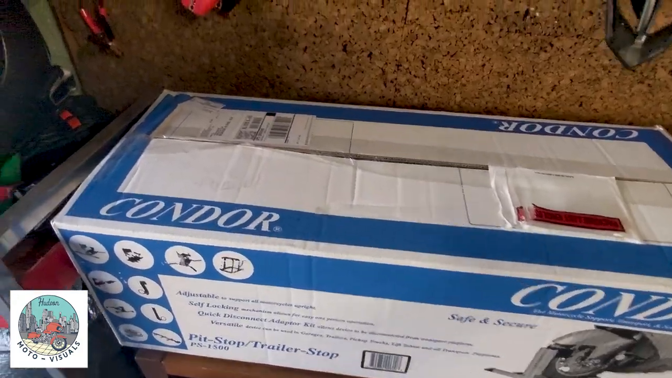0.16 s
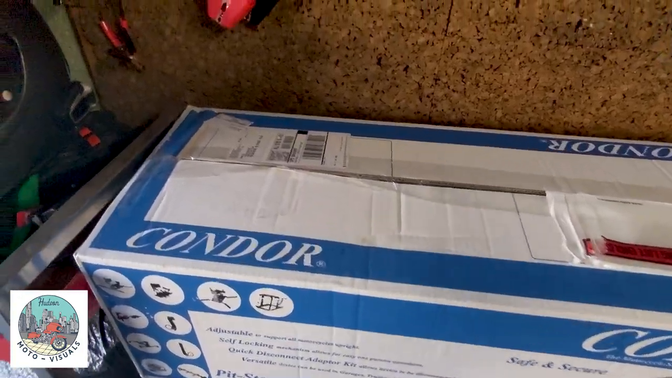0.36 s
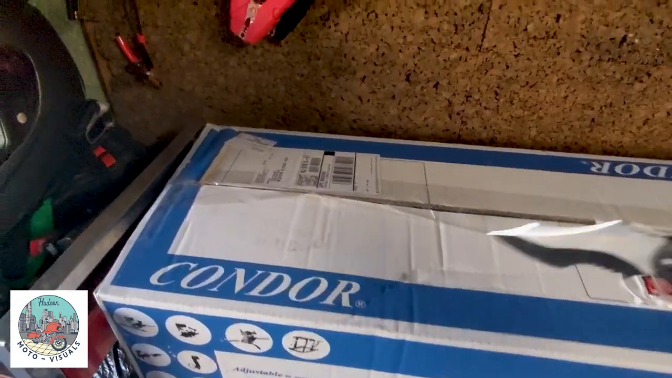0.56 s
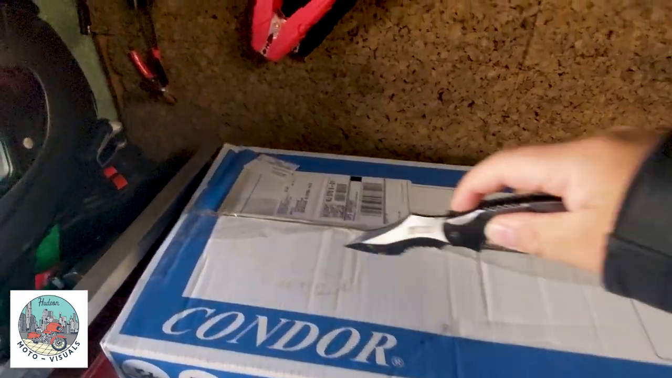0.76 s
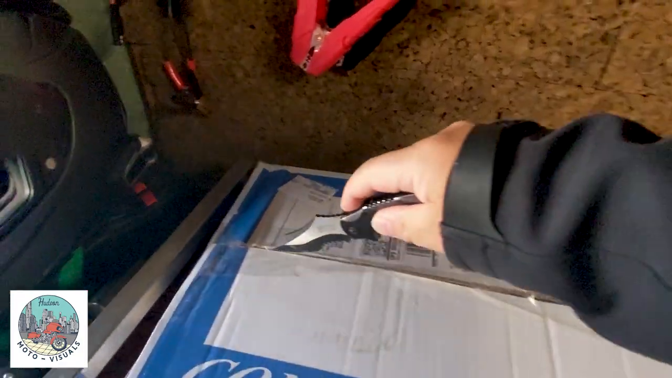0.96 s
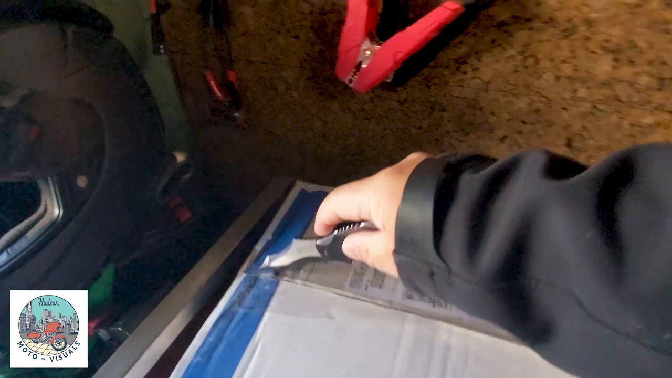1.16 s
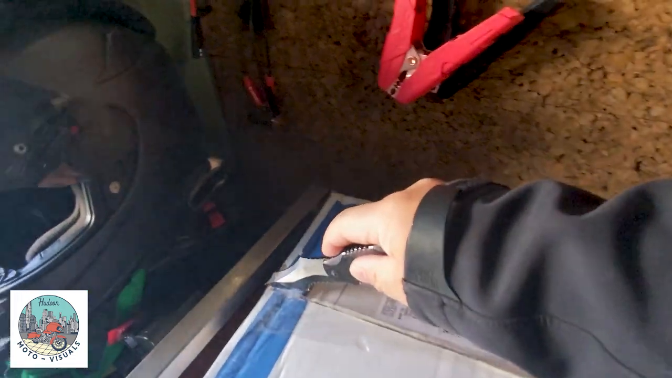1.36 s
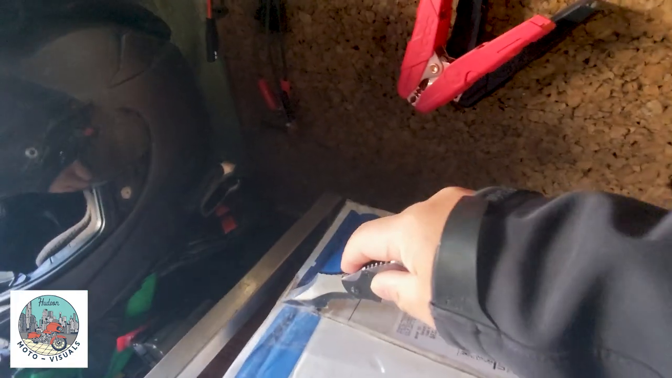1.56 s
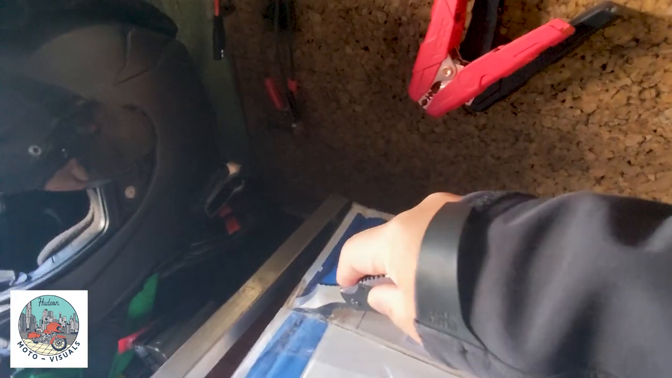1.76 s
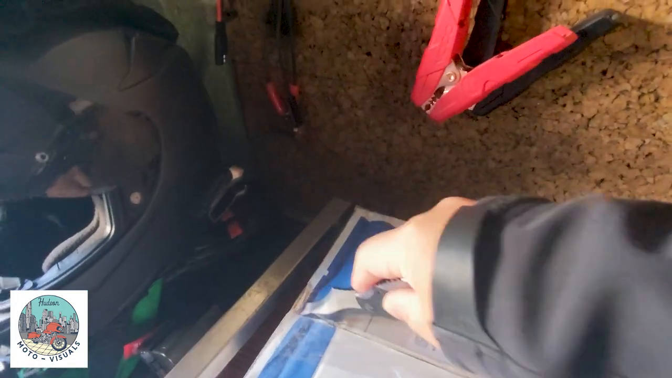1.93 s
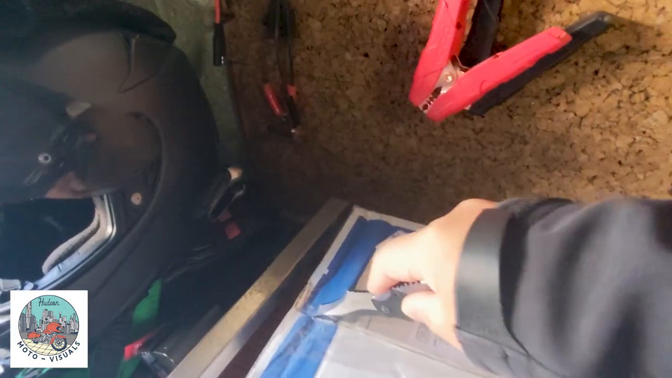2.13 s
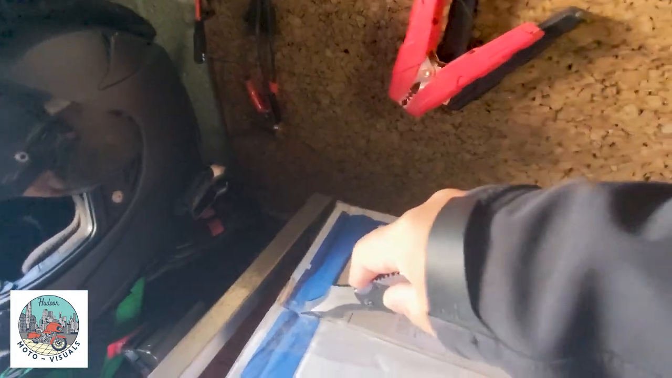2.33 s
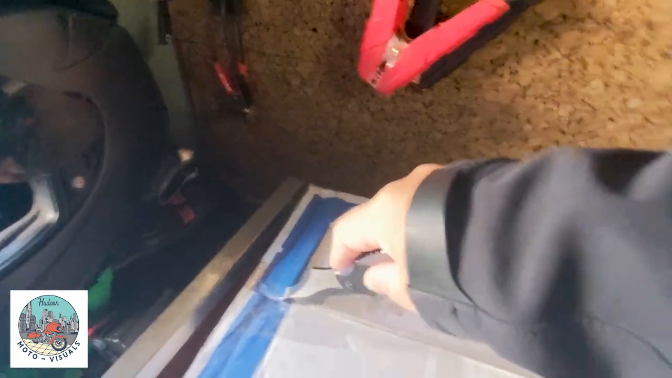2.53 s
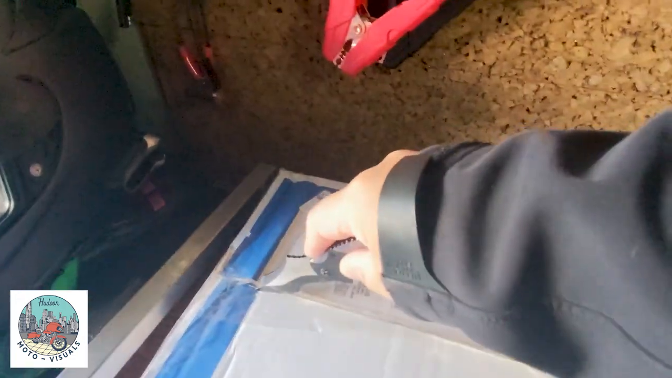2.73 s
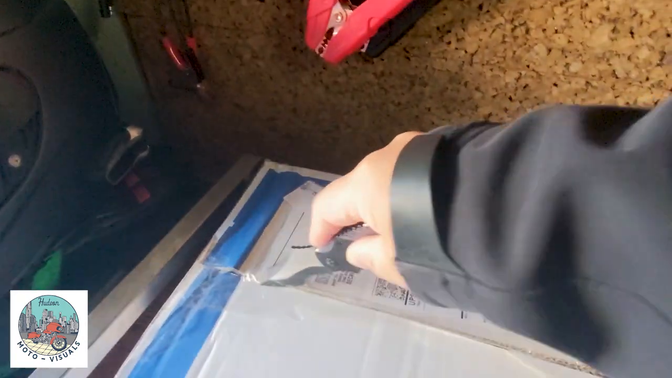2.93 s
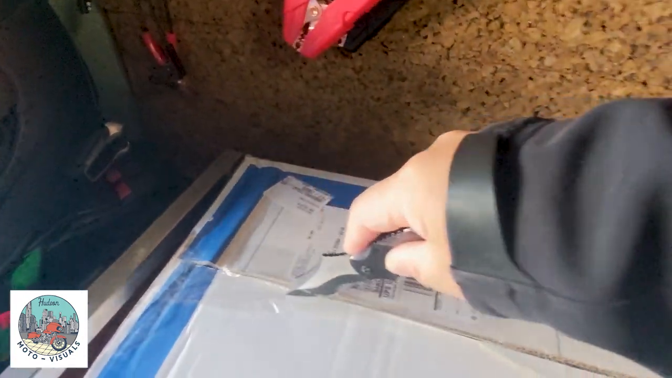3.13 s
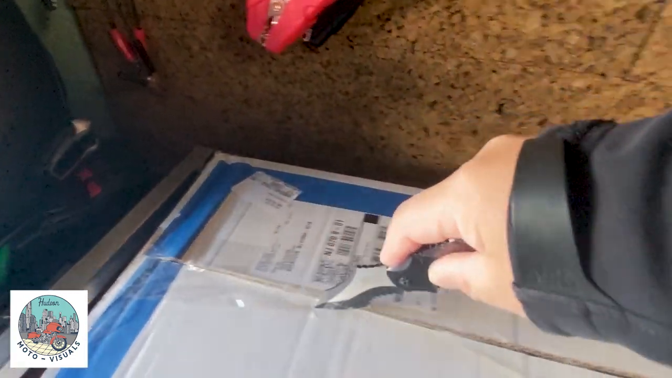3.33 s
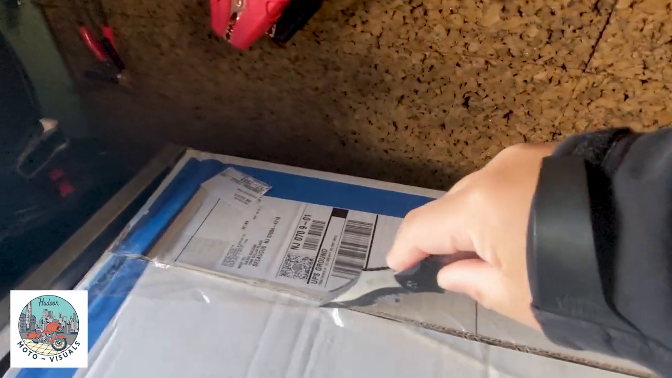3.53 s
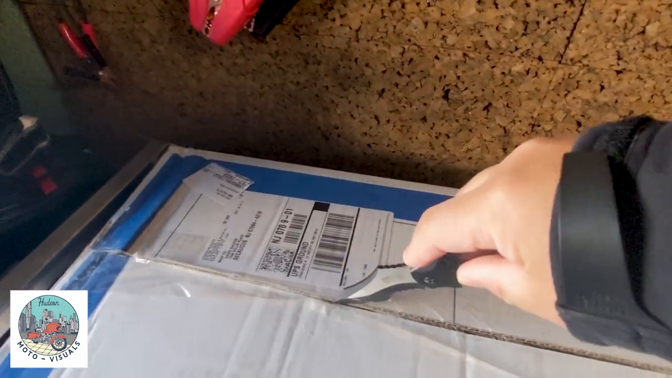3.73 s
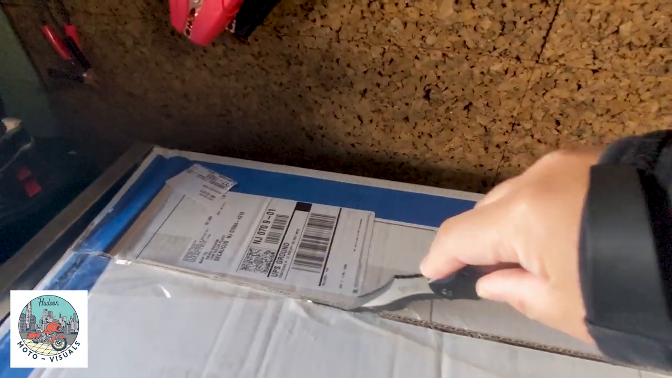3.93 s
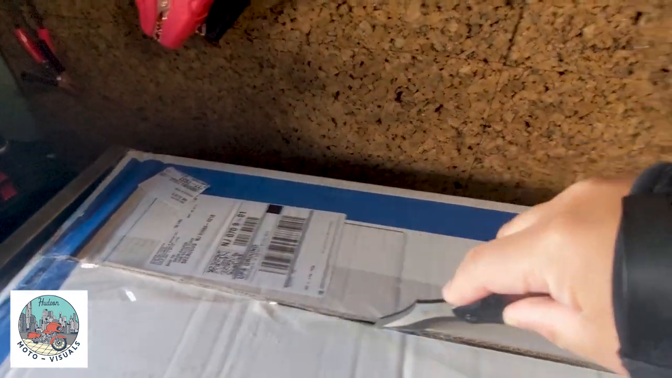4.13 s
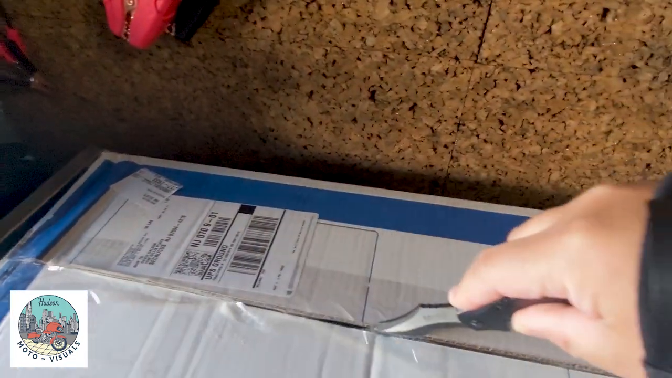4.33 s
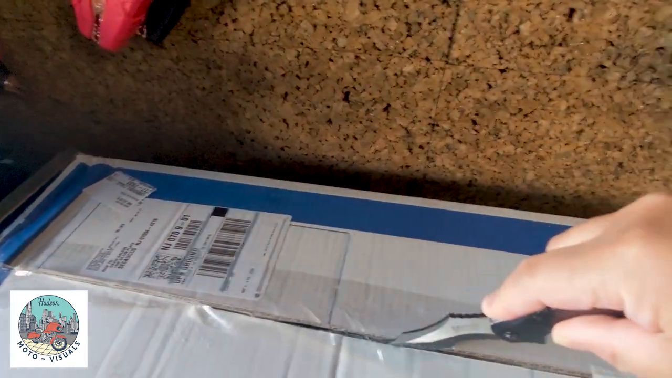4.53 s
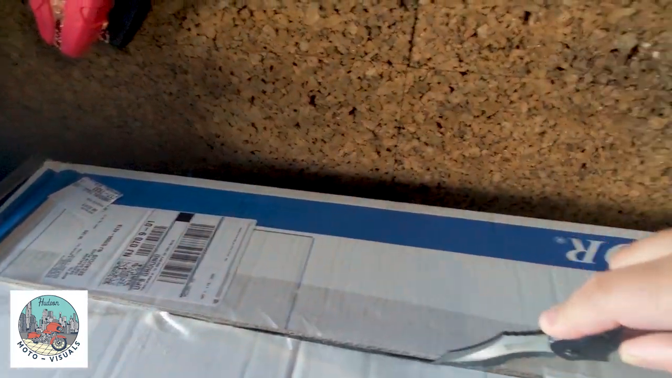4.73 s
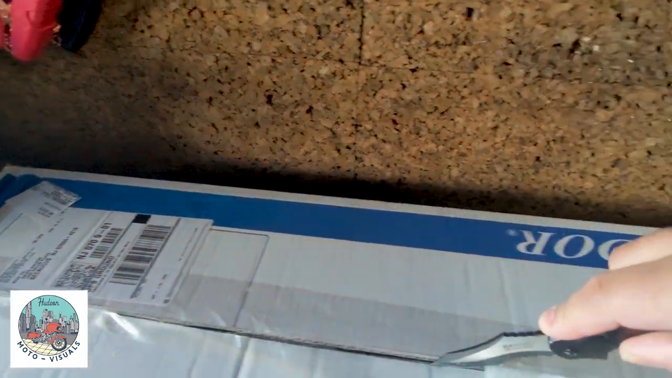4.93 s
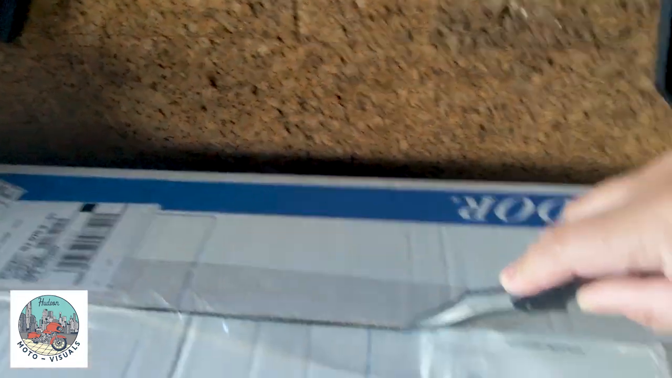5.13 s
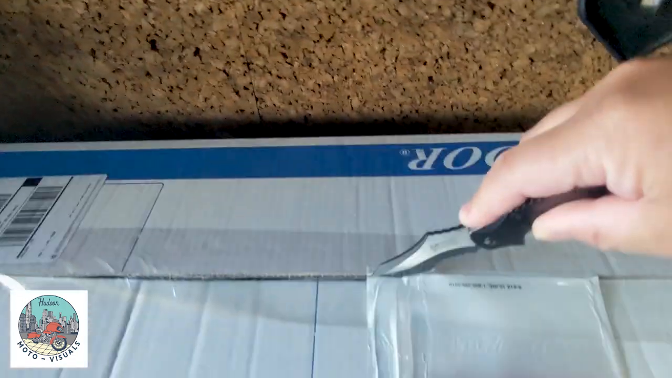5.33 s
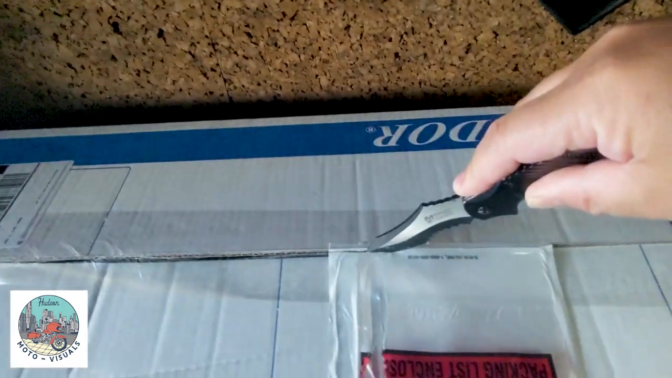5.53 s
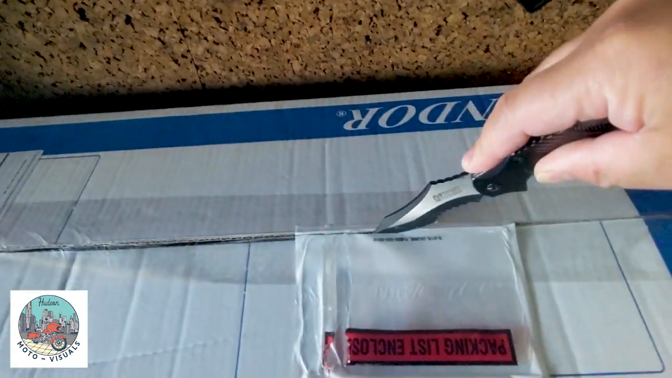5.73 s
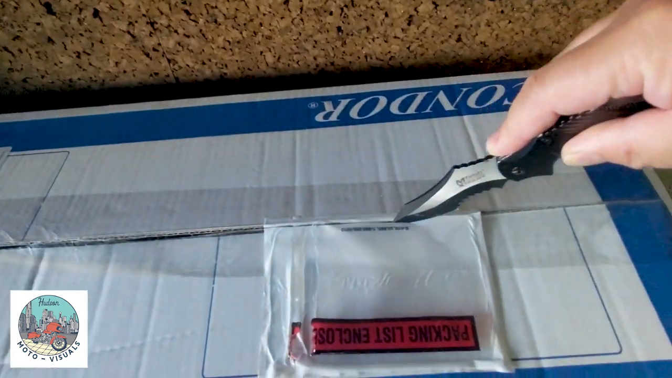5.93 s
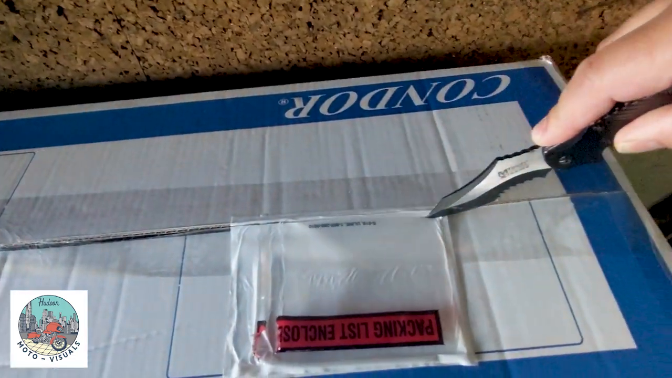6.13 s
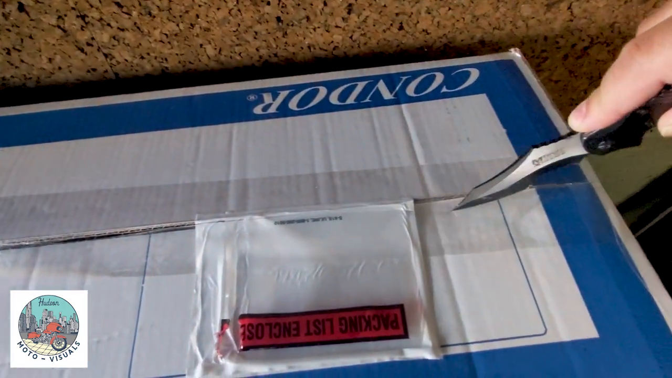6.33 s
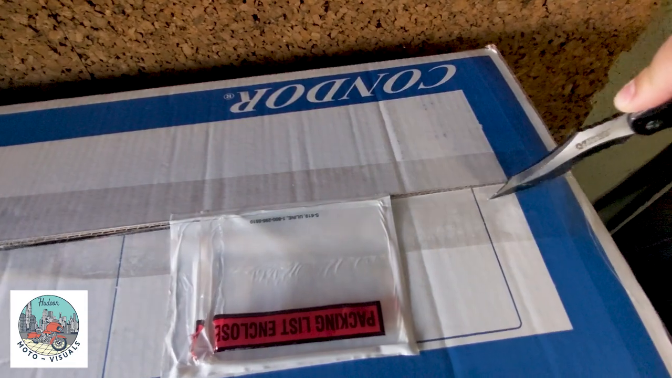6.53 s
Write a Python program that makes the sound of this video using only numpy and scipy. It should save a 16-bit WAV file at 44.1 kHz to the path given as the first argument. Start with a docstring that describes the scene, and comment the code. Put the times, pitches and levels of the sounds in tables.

```python
"""Knife through a cardboard box

A folding knife locks open, a sleeve rustles, then the blade cuts the taped seam of a big box in a garage.
Lock: bursts of steel-coloured noise. Snaps: cracks of tilted noise. Pops: decaying sines with flap noise.
Blade: clicks and noise rasp through flap resonators; jolts and tugs ring the modes of the hollow box.
Around: stereo air noise, low rumble, swells of cloth noise, and dense decaying echoes of the near sounds.
"""
import sys
import numpy as np
from scipy import signal
from scipy.fft import rfft, irfft, next_fast_len
from scipy.io import wavfile

SR = 44100
rng = np.random.default_rng(int(sys.argv[2]) if len(sys.argv) > 2 else 0)


def generate_wav(sig):
    """Save sig (samples, or channels by samples) to the path in sys.argv[1] as 16-bit PCM at SR."""
    pcm = np.round(np.clip(np.atleast_2d(sig).T, -1, 1) * 32767).astype(np.int16)
    wavfile.write(sys.argv[1], SR, pcm)


N = 290178

# Levels are relative within each table.
# garage air spectrum: (frequency [Hz], density [dB])
AIR_SPECTRUM = [(76, -15), (130, -9.5), (259, -10.5), (344, -10.5), (388, -7.5), (645, -11.5), (947, -18),
                (1390, -17), (3910, -26.5), (14900, -40), (16500, -23.5)]
# left-right likeness of the air: (frequency [Hz], correlation [-1..1])
AIR_LIKENESS = [(60, -0.54), (240, 0.94), (950, -0.11), (3770, -0.066), (15000, -0.56)]
# floor of the low rumble: (time [s], level [dB])
RUMBLE_FLOOR = [(0, -55), (1.2, -48.5), (2.9, -47.5), (3.6, -87), (4.9, -43.5), (5.5, -49), (6.25, -36),
                (6.575, -42)]
# tip lands, then punches through: (time [s], level [dB])
THUDS = [(1.26, -31), (2.67, -22.5)]
# knife locking open: (time [s], level [dB])
LOCK_TICKS = [(.002, -9), (.0065, -4), (0.013, -42)]
# colour of the lock: (frequency [Hz], density [dB])
STEEL_SPECTRUM = [(470, -65), (800, -19), (1380, -13), (2380, -11.5), (2800, -1.5), (4260, -9), (7060, -4),
                  (10900, -5), (13300, 3.5), (16500, 1)]
# arm reaches out, cloth and hand brush the box:
# (time [s], level [dB], Gaussian half-width [s], share through the flaps [0..1])
RUSTLES = [(0.67, -55.5, 0.86, 0), (.49, -52, 0.014, 0.3), (.84, -45, 0.016, 0.8),
           (1.33, -46.5, 0.032, 0.73)]
# colour of the cloth: (frequency [Hz], density [dB])
SLEEVE_SPECTRUM = [(1000, -25), (3000, -12), (10000, -16), (14000, -9), (16500, -7)]
# blade drawn along the seam: (time [s], pressure as box drumming [dB], tearing as tape hiss [dB])
DRAG = [(1.12, -80, -63), (1.2, -59, -59.5), (2.1, -51.5, -55), (2.6, -58, -64), (2.8, -56, -61),
        (2.92, -44, -38.5), (3.3, -43.5, -39.5), (3.46, -46, -42), (3.58, -47, -40), (3.78, -54, -52),
        (3.9, -53.5, -75), (3.97, -36, -37), (4.07, -29, -22), (4.22, -46, -49.5), (4.38, -35, -36),
        (4.55, -32, -33), (4.73, -21, -27), (4.85, -28.5, -34.5), (5.24, -44.5, -48), (5.45, -38.5, -41.5),
        (5.72, -32, -40), (6, -34, -39.5), (6.27, -35, -37), (6.575, -35, -44.5)]
# blade lurches forward: (time [s], length [s], drumming level [dB])
LURCHES = [(2.649, 0.0096, -20.5), (3.796, 0.026, -29), (4.092, 0.016, -18)]
# flap resonances: (frequency [Hz], width [Hz], level [dB])
FLAP_MODES = [(1244, 206, 3), (1414, 131, 2.5), (1800, 240, -4.5), (2300, 100, 3), (3180, 1100, -11.5)]
# colour of cracks and hiss: (frequency [Hz], density [dB])
TAPE_SPECTRUM = [(1470, -11.5), (2500, -2), (3050, -6.5), (3320, -2), (4140, -5), (6050, -4.5), (7150, 0),
                 (9490, -1), (14300, 4.5), (15400, 6), (16500, 3)]
# jolts of the blade on the box: (time [s], level [dB], hardness [0..1])
JOLTS = [(1.237, -31.5, 0.87), (2.379, -34, 1), (2.643, -9.5, 0.7), (2.656, -11, 0.94),
         (3.011, -20.5, 0.78), (3.2, -33, 1), (3.612, -25.5, 0.82), (3.637, -34, 1), (3.796, -14.5, 0.58),
         (3.82, -25.5, 0.93), (4.009, -16, 0), (4.065, -6.5, 0.6), (4.074, -29, 1), (4.098, -20.5, 1),
         (4.361, -25, 0.9), (4.584, -12, 0.5), (4.633, -32, 0.3), (4.687, -23, 0.3), (4.724, -14, 0.82),
         (4.744, -5, 0.4), (4.865, -23, 0.77), (4.948, -24, 0.3), (5.047, -25, 0.6), (5.394, -20.5, 0.36),
         (5.451, -19, 0.62), (5.503, -13.5, 0.35), (5.634, -3.5, 0.06), (5.676, -12, 0.4), (5.765, -6.5, 0),
         (5.799, -13, 0.55), (5.848, -28, 0.7), (5.912, -18.5, 0.4), (5.964, -10.5, 0.58),
         (6.499, -1, 0.55)]
# modes of the hollow box: (frequency [Hz], level [dB], T60 when jolted [s])
BOX_MODES = [(84.6, -16.5, 0.16), (163, -8.5, 0.23), (206.5, 0.5, 0.11), (257, -10.5, 0.078),
             (347.4, -6.5, 0.078), (406, -11.5, 0.068), (540.5, -7.5, 0.039), (759, -10, 0.029)]
# flaps popping free: (time [s], level [dB], pitch [Hz])
POPS = [(1.238, -34, 1940), (1.808, -37.5, 1910), (1.9062, -21, 2210), (2.014, -28.5, 1920),
        (2.2995, -37, 1420), (2.6436, -8, 2065), (2.865, -29, 1740), (2.9396, -19.5, 1980),
        (2.9588, -17, 2250), (2.972, -25, 1980), (3.007, -9, 1680), (3.0216, -18.5, 2090),
        (3.109, -35.5, 1220), (3.1307, -20, 2290), (3.2024, -26, 1840), (3.223, -28.5, 2290),
        (3.386, -39, 2330), (3.496, -21.5, 2500), (3.595, -22, 1280), (3.6118, -19.5, 1270),
        (3.6362, -20, 780), (3.794, -18, 1310), (3.8218, -20.5, 1290), (4.0636, -15.5, 905),
        (4.072, -11, 2160), (4.096, -14.5, 2310), (4.633, -26, 1210), (4.683, -15.5, 1230),
        (4.722, -18.5, 1250), (4.7728, -22.5, 2210), (5.3036, -31, 1400), (5.632, -27, 2260),
        (5.759, -23, 1330), (5.7988, -25.5, 2295), (6.0265, -26.5, 1390), (6.0893, -31, 1980),
        (6.496, -11, 850)]
# clear partings of tape and glue: (time [s], level [dB], top over lower treble [dB])
SNAPS = [(1.629, -47, -11), (1.6859, -39.5, -4), (1.768, -41.5, -1), (1.8074, -23.5, 7.5), (1.847, -43, -6),
         (1.876, -44, 0), (1.908, -19, 9), (2.0144, -13, 3), (2.058, -32, -1), (2.2769, -24.5, 1.5),
         (2.332, -42, -4), (2.4322, -20.5, 3.5), (2.491, -28.5, 7), (2.577, -34, 3), (2.6436, -2, 0),
         (2.7127, -21, 4.5), (2.843, -35, 0), (2.8727, -24.5, 11), (2.905, -29, 2), (2.9604, -16, 12),
         (3.0073, -6, 4), (3.022, -11, 4.5), (3.098, -22.5, 4), (3.1307, -11, 12), (3.2027, -12, 10),
         (3.2346, -19.5, 12), (3.2948, -15, 8), (3.3382, -20, -5.5), (3.3874, -20, -1.5),
         (3.3989, -23, -1.5), (3.4278, -18.5, -4), (3.442, -4.5, 11), (3.4982, -26.5, -7.5),
         (3.5324, -10.5, 3), (3.5505, -24, 6), (3.5703, -24, -8.5), (3.596, -12, -1), (3.6107, -2.5, 6),
         (3.6903, -16, 30), (3.732, -4.5, 32), (3.7638, -13, 9), (3.7964, -11, 4), (3.8205, -1.5, 6),
         (3.8248, -17, 7), (3.9305, -22.5, 20), (3.9398, -16.5, 4.5), (3.9844, -22, 14), (3.9975, -14.5, 0),
         (4.0125, -8, 4), (4.0335, -4.5, 5), (4.0639, -11, -2), (4.0675, -8, 16), (4.075, -9.5, 0),
         (4.0948, -13, 13), (4.1008, -7, 7), (4.1516, -22, -8), (4.1787, -22.5, 16), (4.2476, -17.5, 0.5),
         (4.3457, -20.5, -2), (4.3583, -10, 1), (4.6155, -14, 27), (4.6916, -15, 16), (4.7107, -10, 12),
         (4.7303, -8, 7), (4.7345, -13, 20), (4.774, -17, 4), (4.8543, -20, 4), (4.9242, -13, 34),
         (4.979, -21.5, 22), (5.1165, -21, 1.5), (5.321, -18, 5.5), (5.4313, -23.5, 4), (5.4407, -19, 6),
         (5.4923, -25, 8), (5.5688, -22, 3), (5.6243, -22.5, 26), (5.781, -17.5, 25), (6.0279, -10.5, 10),
         (6.0888, -20, 3), (6.1677, -17, 35), (6.2196, -20, 11), (6.2496, -18.5, 7), (6.371, -13.5, 6),
         (6.4634, -19, 7), (6.4963, 0, 27), (6.5345, -15, 3.5)]
# side of the blade: (time [s], left over right [dB])
BLADE_SIDE = [(1.2, 18), (2.9, 1.5), (3.1, 4), (4.1, 0), (4.6, -2), (5.5, 2.5), (6.58, 1)]

AIR_DB = -54
THUD_RISE_DB_PER_S, THUD_FALL_DB_PER_S = 450, 220
RUMBLE_DB_PER_PRESSURE_DB, RUMBLE_AT_FULL_DB = 1.307, 4.5  # bench shakes more than in proportion
LOCK_T60_S = 0.024
LURCH_EDGE_DB_PER_S, LURCH_HISS_DB = 1500, -4
RASP_PRESSURE_SHARE, RASP_DB = 0.7, -9
CONTACT_HZ = 1430
DULL_HZ, DULL_BELOW_DB, DULL_SPAN_DB = 356, -53.5, 19
POP_T60_S = 0.022
CRACKLE_COUNT, CRACKLE_FROM_S = 70, 1.6
CRACKLE_OVER_HISS_DB, CRACKLE_SPREAD_DB, CRACKLE_BRIGHT_DB = 8, 3.5, 1.5
CRACK_T60_S, FLUTTER_T60_S, FLUTTER_DB = 0.0045, 0.03, -18
GARAGE_T60_S, GARAGE_DB, WALL_CUT_HZ = 0.22, -7.5, 6800
SNAP_ROOM_DB, POP_ROOM_DB, LOCK_ROOM_DB, BOX_ROOM_DB = -7, -12, 1.5, -8.5
LOW_CUT_HZ, TOP_CUT_HZ = 47.7, 16400


def amp(db):
    """Gain of a level in dB."""
    return 10 ** (np.asarray(db) / 20)


def unit(x):
    """Scale to rms 1."""
    return x / np.sqrt(np.mean(x ** 2) + 1e-20)


def loudest(*levels_db):
    """Levels added as powers, in dB."""
    return 10 * np.log10(sum(amp(db) ** 2 for db in levels_db))


def in_time(rows):
    """Columns of a time curve at every sample."""
    time_s, *columns = np.transpose(rows)
    return [np.interp(np.arange(N) / SR, time_s, column) for column in columns]


def at_hz(points, hz):
    """Spectrum read on a log-frequency axis."""
    point_hz, value = np.array(points).T
    return np.interp(np.log(np.maximum(hz, 1)), np.log(point_hz), value)


def colour(x, points):
    """Minimum-phase spectrum filter, so nothing sounds early; white noise keeps its rms."""
    gain = amp(at_hz(points, np.linspace(0, SR / 2, 513)))
    cepstrum = irfft(np.log(gain))
    cepstrum[1:512] *= 2  # fold the anticausal half forward
    cepstrum[513:] = 0
    taps = irfft(np.exp(rfft(cepstrum)))[:512]
    taps = taps / np.linalg.norm(taps)
    return signal.oaconvolve(np.atleast_2d(x), taps[None], axes=1)[:, :N]


def drift(rate_hz):
    """Slow random wander of rms 1: twice low-passed noise, first second dropped."""
    r = np.exp(-2 * np.pi * rate_hz / SR)
    noise = rng.standard_normal(N + SR)
    return unit(signal.lfilter([1], [1, -2 * r, r * r], noise)[SR:])


def grains(per_s, spread_db):
    """Random clicks of uneven size and sign, rms 1."""
    size_db = spread_db * np.minimum(rng.exponential(1, N), 4)
    sizes = amp(size_db) * rng.choice([-1, 1], N)
    return unit(sizes * (rng.random(N) < per_s / SR))


def pair(alike):
    """Two white noises correlated by the given share."""
    mid, side = rng.standard_normal((2, N))
    alike = np.clip(alike, -1, 1)
    return (np.sqrt(1 + alike) * mid + np.sqrt(1 - alike) * side * [[1], [-1]]) / np.sqrt(2)


def bursts(times_s, gains, t60_s):
    """Stereo envelope that jumps at each time and decays 60 dB in t60_s."""
    clicks = np.full((2, N), 1e-18)
    at = (np.asarray(times_s) * SR).astype(int)
    np.add.at(clicks, (slice(None), at), gains)
    return signal.lfilter([1], [1, -amp(-60 / (t60_s * SR))], clicks)


def strike(force, hz, t60_s):
    """Two-pole mode: a unit click rings a decaying sine of height 1."""
    r, w = amp(-60 / (t60_s * SR)), 2 * np.pi * hz / SR
    return signal.lfilter([0, np.sin(w)], [1, -2 * r * np.cos(w), r * r], force + 1e-18)


def flaps(x):
    """Parallel resonances of the cardboard flaps; white noise keeps its rms."""
    out, power = 0, 0
    for k, (hz, width_hz, db) in enumerate(FLAP_MODES):
        r = np.exp(-np.pi * width_hz / SR)
        b = np.array([1, 0, -1]) * (1 - r * r) / 2
        a = [1, -2 * r * np.cos(2 * np.pi * hz / SR), r * r]
        out = out + (-1) ** k * amp(db) * signal.lfilter(b, a, x)
        power += amp(db) ** 2 * np.pi * width_hz / SR
    return out / np.sqrt(power)


def place(times_s, sounds):
    """Short stereo sounds laid down at their times."""
    out = np.zeros((2, N + SR))
    for s, sound in zip(times_s, sounds):
        start = int(s * SR)
        out[:, start:start + sound.shape[1]] += sound
    return out[:, :N]


def air():
    """Steady stereo noise whose left-right correlation varies with frequency."""
    size = next_fast_len(N)
    hz = np.linspace(0, SR / 2, size // 2 + 1)
    mid, side = rfft(rng.standard_normal((2, size)))
    alike = np.clip(at_hz(AIR_LIKENESS, hz), -1, 1)
    both = np.sqrt(1 + alike) * mid + np.sqrt(1 - alike) * side * [[1], [-1]]
    noise = irfft(both * amp(at_hz(AIR_SPECTRUM, hz)), size)[:, :N]
    return amp(AIR_DB) * unit(noise)


def rumble():
    """Low noise, nearly alike left and right, that swells with blade pressure and each thud."""
    t = np.arange(N) / SR
    thuds_db = [db - np.maximum(THUD_RISE_DB_PER_S * (s - t), THUD_FALL_DB_PER_S * (t - s))
                for s, db in THUDS]
    shaken_db = RUMBLE_AT_FULL_DB + RUMBLE_DB_PER_PRESSURE_DB * in_time(DRAG)[0]
    level_db = loudest(in_time(RUMBLE_FLOOR)[0], shaken_db, *thuds_db)
    band = signal.butter(2, [55, 150], "band", fs=SR, output="sos")
    return amp(level_db) * unit(signal.sosfilt(band, pair(alike=0.97)))


def lock():
    """Blade hits its stop and the lock bar drops in: decaying steel-coloured noise ticks."""
    s, db = np.transpose(LOCK_TICKS)
    return colour(bursts(s, amp(db), LOCK_T60_S) * pair(alike=0.18), STEEL_SPECTRUM)


def sleeve():
    """Gaussian swells of bright cloth noise, partly carried by the cardboard."""
    t, out = np.arange(N) / SR, 0
    rubbing = amp(2.0 * drift(rate_hz=25)) * pair(alike=0.05)
    cloth, card = colour(rubbing, SLEEVE_SPECTRUM), flaps(rubbing)
    for s, db, width_s, share in RUSTLES:
        swell = amp(db) * np.exp(-((t - s) / width_s) ** 2)
        out = out + swell * (cloth + np.clip(share, 0, 1) * (card - cloth))
    return out


def stroke():
    """Pressure and tearing levels along the cut, with sudden lurches added as powers."""
    t = np.arange(N) / SR
    drum_db, hiss_db = in_time(DRAG)
    for s, length_s, db in LURCHES:
        outside_s = np.maximum(0, np.maximum(s - t, t - s - length_s))
        lurch_db = db - LURCH_EDGE_DB_PER_S * outside_s
        drum_db = loudest(drum_db, lurch_db)
        hiss_db = loudest(hiss_db, lurch_db + LURCH_HISS_DB)
    return drum_db, hiss_db


def scrape(rasp_db, hiss_db, grip):
    """Fibres and tape tear in tiny clicks over rubbing noise; both swell when the blade grips."""
    clumps = grip * amp(2.84 * drift(rate_hz=13.6))
    tears = np.abs(grains(per_s=320, spread_db=7))
    tearing = signal.lfilter([1], [1, -.95], tears) + 26.0  # steady part under the tears
    fibres = grains(per_s=1100, spread_db=5.0) * [[1.], [.8]]
    rasp = unit(flaps(clumps * (fibres + 1.43 * pair(alike=0.033))))
    hiss = unit(colour(np.sqrt(grip) * clumps * tearing * pair(alike=0.016), TAPE_SPECTRUM))
    return amp(rasp_db) * rasp * amp([[2.5], [-2.5]]) + amp(hiss_db) * hiss


def box(drum_db, grip):
    """Jolts and uneven blade drag drive the same box modes; hard jolts favour the upper ones."""
    s, db, hard = np.transpose(JOLTS)
    chance_db = rng.normal(0, 2.5, (len(s), len(BOX_MODES)))
    drag, jolts = 0, 0
    tugs = grains(per_s=400, spread_db=2.5) * grip ** 1.5
    for k, (hz, mode_db, t60_s) in enumerate(BOX_MODES):
        force = np.zeros(N)
        at = ((s + 0.64 / hz) * SR).astype(int)  # big slow panels answer later
        tilt_db = 17.7 * (hard - .5) * np.log2(hz / 200)
        force[at] = (-1) ** k * amp(db + mode_db - 9.0 + tilt_db + chance_db[:, k])
        jolts = jolts + strike(force, hz, t60_s)
        drag = drag + amp(mode_db) * strike(tugs * rng.standard_normal(N), hz, 0.49 * t60_s)
    # cardboard gives: a soft contact
    jolts = signal.sosfilt(signal.butter(2, CONTACT_HZ, fs=SR, output="sos"), jolts)
    # light tugs leave the whole box still
    drag = signal.sosfilt(signal.butter(2, [130, 1500], "band", fs=SR, output="sos"), drag)
    dull = signal.sosfilt(signal.butter(2, DULL_HZ, fs=SR, output="sos"), drag)
    # light pressure stirs mostly the low modes
    upper = np.clip((drum_db - DULL_BELOW_DB) / DULL_SPAN_DB, .15, 1)
    return jolts + amp(drum_db) * unit(dull + upper * (drag - dull))


def pops():
    """A freed flap rings briefly in two modes with flap noise, louder and phase-leading at left."""
    t, sounds = np.arange(SR // 10) / SR, []
    shape = amp(-60 * t / POP_T60_S) * (1 - np.exp(-t / 0.00018))
    for s, db, hz in POPS:
        detune, lead, phase = rng.uniform(size=3)
        turn = 2 * np.pi * hz * t + np.array([[1.68 * lead], [0]])
        second = np.sin(turn * (1.6 + 0.11 * detune) + 2 * np.pi * phase)
        ring = np.sin(turn) + 0.32 * second
        rough = 0.83 * flaps(rng.standard_normal((2, len(t))))  # other flap modes are shaken too
        sounds.append(amp(db + np.array([[2.5], [-2.5]])) * shape * (ring + rough))
    return place(np.transpose(POPS)[0], sounds)


def crackle(hiss_db):
    """Rows of small snaps at random moments, levels following the tearing."""
    when, size, tone = rng.uniform(size=(CRACKLE_COUNT, 3)).T
    s = CRACKLE_FROM_S + when * (N / SR - CRACKLE_FROM_S)
    extra_db = CRACKLE_OVER_HISS_DB - CRACKLE_SPREAD_DB * np.log(1 - size * .95)
    db = hiss_db[(s * SR).astype(int)] + extra_db
    return list(zip(s, db, CRACKLE_BRIGHT_DB + 12 * (tone - .5)))


def snaps(rows):
    """Each snap is a short noise crack, then the freed tape flutters in a weaker, longer decay."""
    t, sounds = np.arange(SR // 10) / SR, []
    decay = amp(-60 * t / CRACK_T60_S) + amp(FLUTTER_DB - 60 * t / FLUTTER_T60_S)
    shape = decay * np.clip(t / 0.00067, 0, 1) ** 2
    low = signal.butter(2, 8000, fs=SR, output="sos")
    for s, db, bright_db in rows:
        # random left-right offset around the blade's side
        pan_db = np.interp(s, *np.transpose(BLADE_SIDE)) + rng.uniform(-11, 11)
        noise = rng.standard_normal((2, len(t)))
        # the crack keeps its size
        noise[:, :60] /= np.sqrt(np.mean(noise[:, :60] ** 2, axis=1, keepdims=True))
        crack = noise * shape
        tilted = crack + (amp(6.5 - bright_db) - 1) * signal.sosfilt(low, crack)
        strength = np.sqrt(2 / (1 + .5 * amp(-14.0 - bright_db) ** 2))  # offsets the tilt
        side_db = np.array([[.5], [-.5]]) * pan_db
        sounds.append(amp(db + 3.5 + side_db) * strength * tilted)
    return colour(place(np.transpose(rows)[0], sounds), TAPE_SPECTRUM)


def garage(x):
    """Dense decaying echoes, independent per channel, duller than the direct sound."""
    t = np.arange(SR // 2) / SR
    decay = amp(-60 * t / GARAGE_T60_S) * np.clip(t / 0.00043, 0, 1)
    tail = rng.standard_normal((2, len(t))) * decay
    tail = signal.sosfilt(signal.butter(1, WALL_CUT_HZ, fs=SR, output="sos"), tail)
    tail = tail / np.linalg.norm(tail, axis=1, keepdims=True)
    return amp(GARAGE_DB) * signal.oaconvolve(x, tail, axes=1)[:, :N]


def scene():
    """All sources with the garage around them."""
    drum_db, hiss_db = stroke()
    # flaps rasp with both pressure and tearing
    rasp_db = RASP_DB + RASP_PRESSURE_SHARE * drum_db + (1 - RASP_PRESSURE_SHARE) * hiss_db
    grip = amp(1.64 * drift(rate_hz=24.0))  # blade sticks and slips unevenly
    click = lock()
    cutting = scrape(rasp_db, hiss_db, grip) + snaps(list(SNAPS) + crackle(hiss_db))
    hollow = box(drum_db, grip) * np.ones((2, 1))
    flap = pops()
    # knife opens in free air, the cut is close
    to_room = amp(SNAP_ROOM_DB) * cutting + amp(POP_ROOM_DB) * flap
    to_room = to_room + amp(LOCK_ROOM_DB) * click + amp(BOX_ROOM_DB) * hollow
    near = cutting + flap + click + hollow
    return near + garage(to_room) + air() + rumble() + sleeve()


def record(dry):
    """High-pass the deepest bass, round peaks by tanh, low-pass the top."""
    dry = signal.sosfilt(signal.butter(4, LOW_CUT_HZ, "high", fs=SR, output="sos"), dry)
    rounded = np.tanh(dry)
    return signal.sosfilt(signal.cheby2(14, 75, TOP_CUT_HZ, fs=SR, output="sos"), rounded)


dry = scene()
out = record(dry)
generate_wav(out)
```